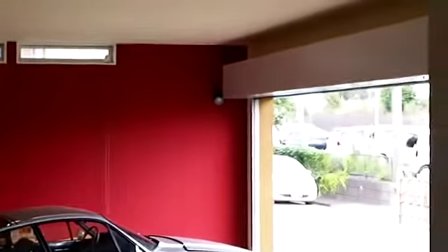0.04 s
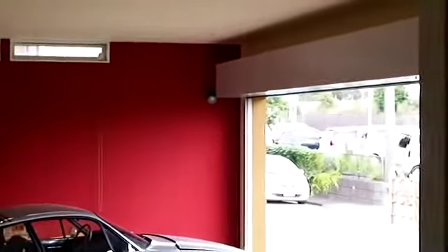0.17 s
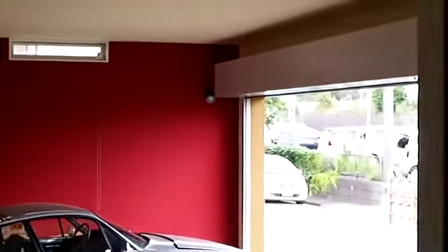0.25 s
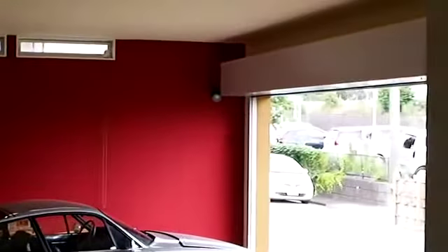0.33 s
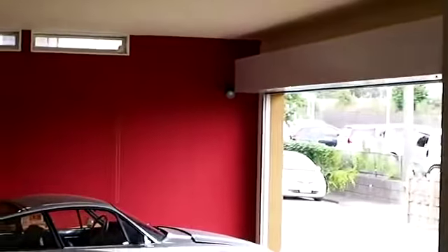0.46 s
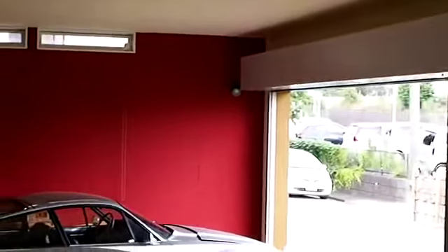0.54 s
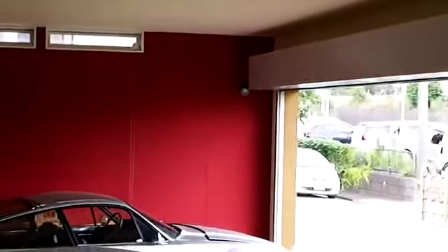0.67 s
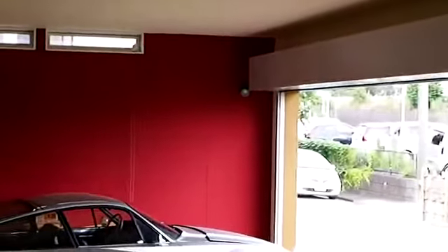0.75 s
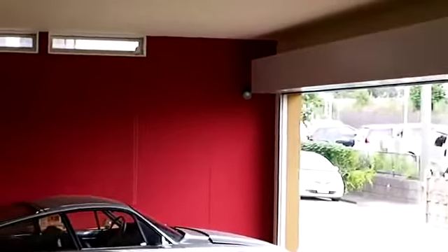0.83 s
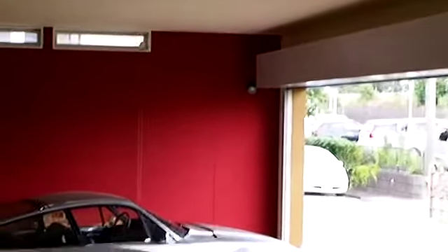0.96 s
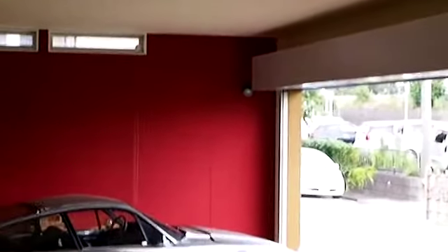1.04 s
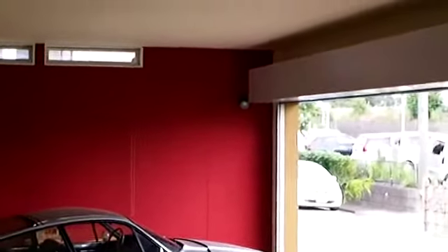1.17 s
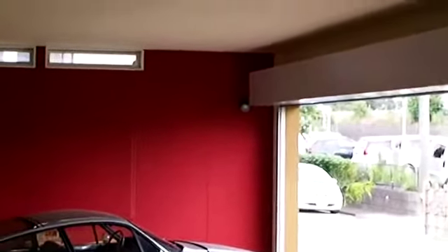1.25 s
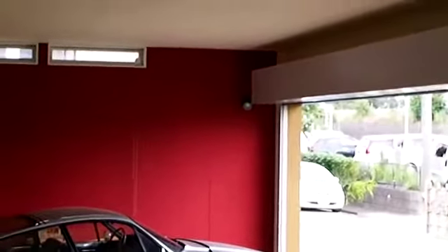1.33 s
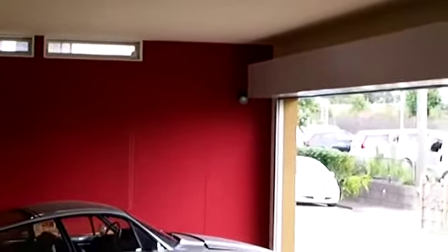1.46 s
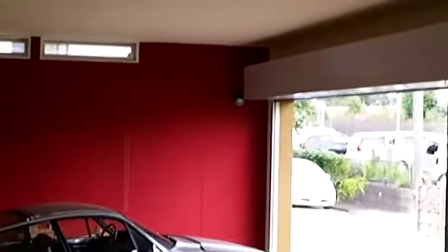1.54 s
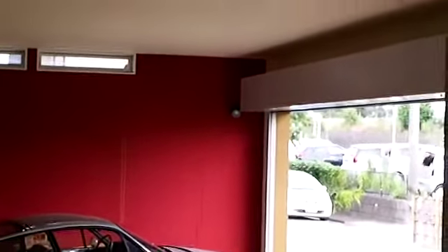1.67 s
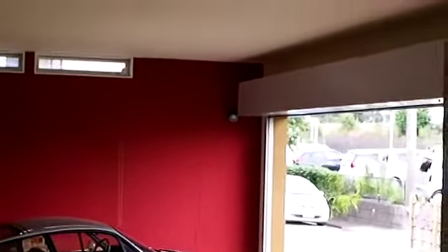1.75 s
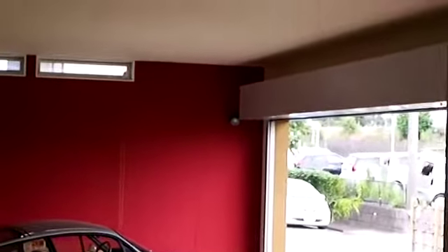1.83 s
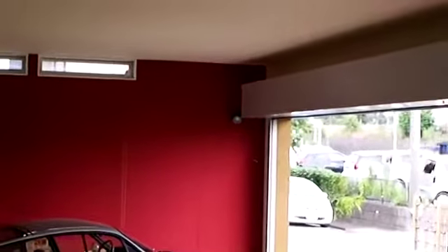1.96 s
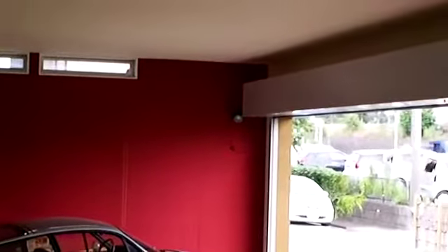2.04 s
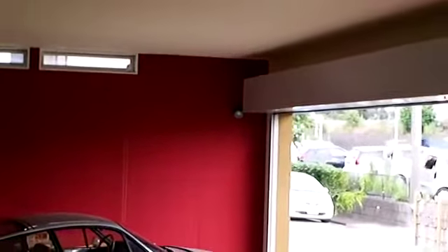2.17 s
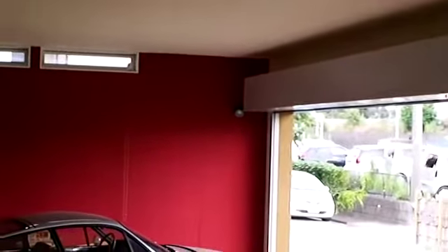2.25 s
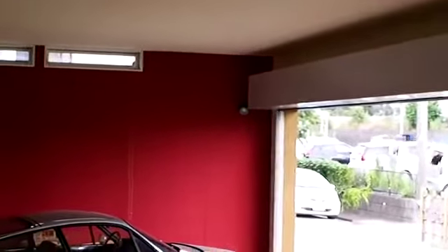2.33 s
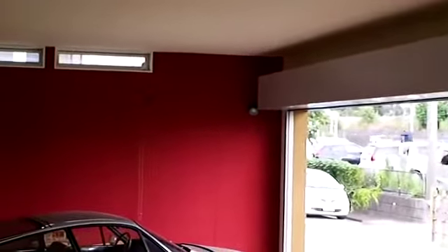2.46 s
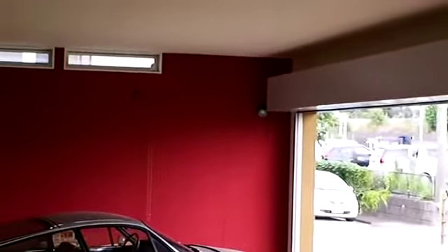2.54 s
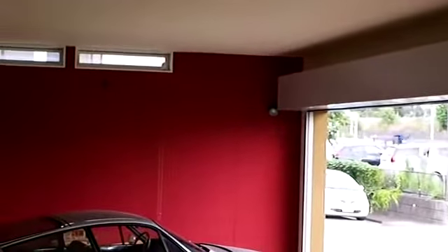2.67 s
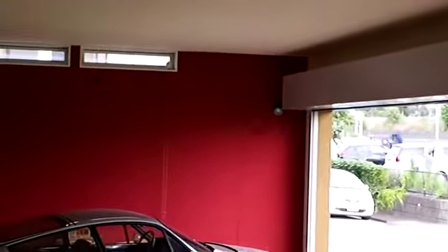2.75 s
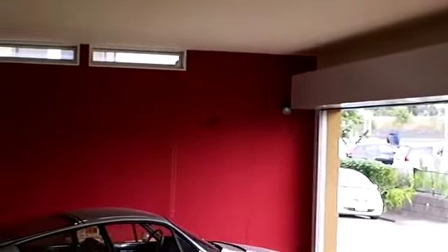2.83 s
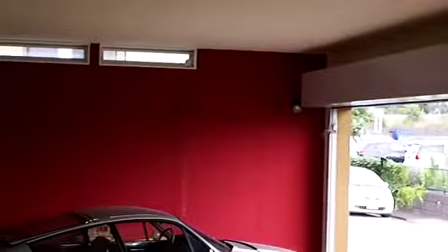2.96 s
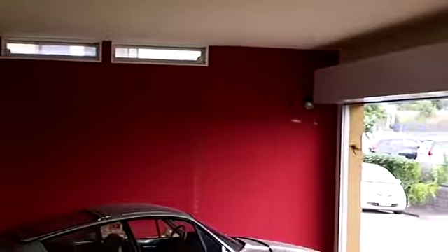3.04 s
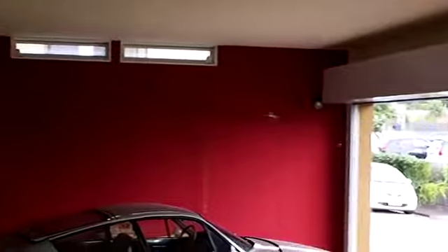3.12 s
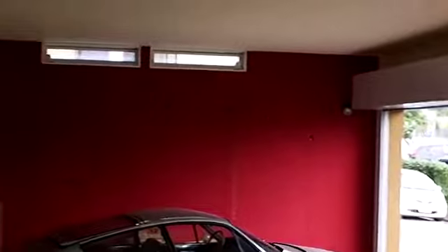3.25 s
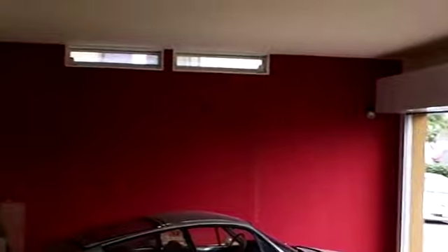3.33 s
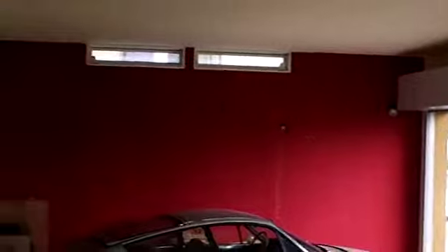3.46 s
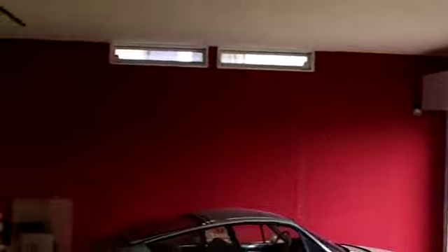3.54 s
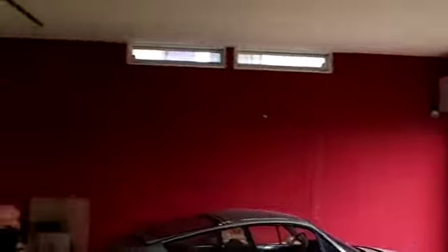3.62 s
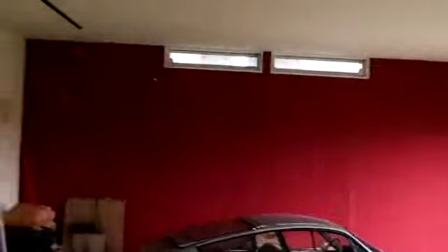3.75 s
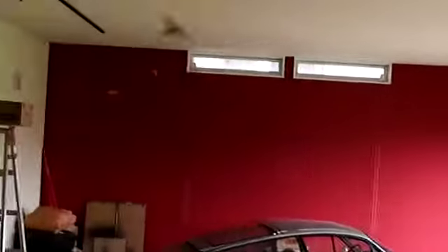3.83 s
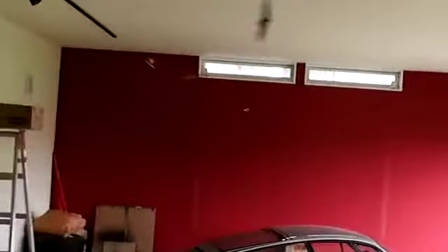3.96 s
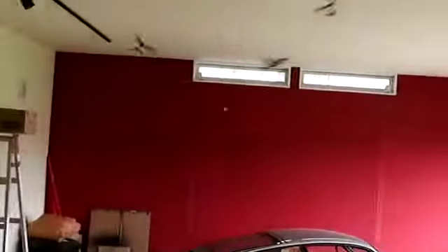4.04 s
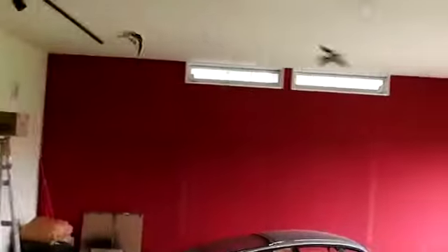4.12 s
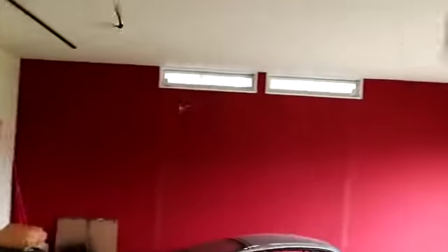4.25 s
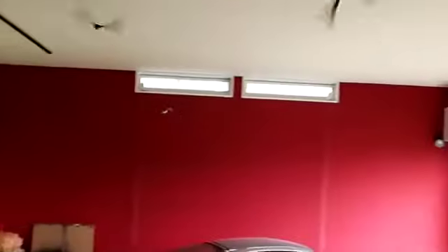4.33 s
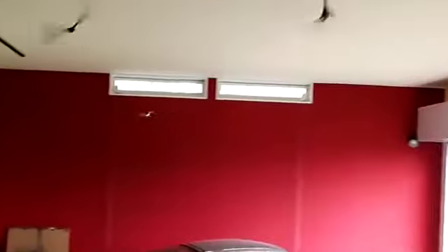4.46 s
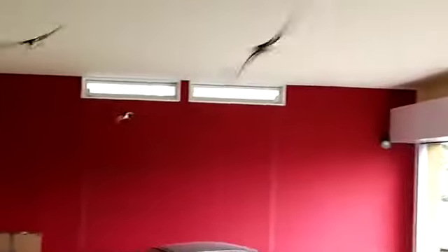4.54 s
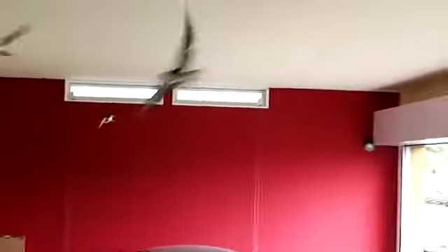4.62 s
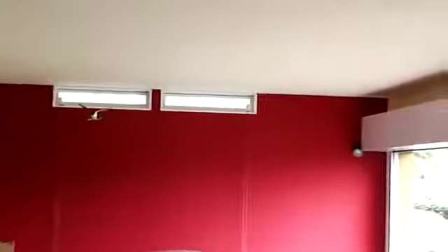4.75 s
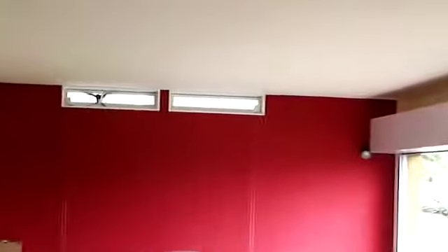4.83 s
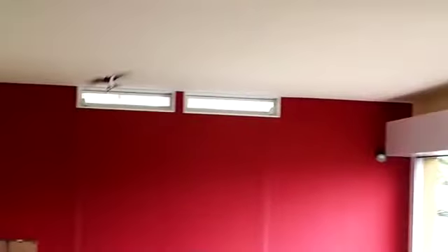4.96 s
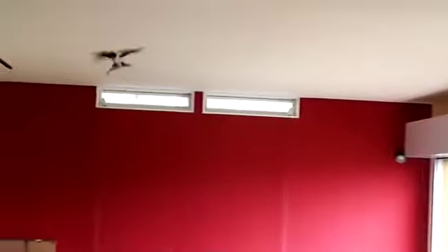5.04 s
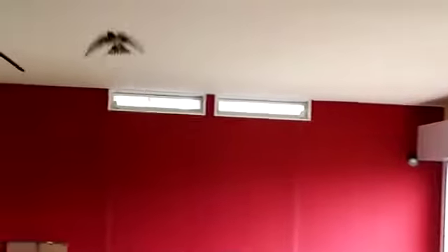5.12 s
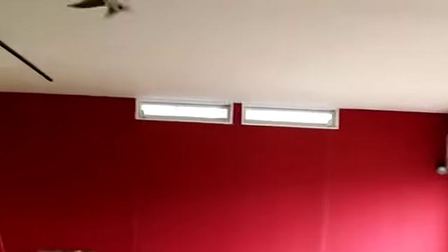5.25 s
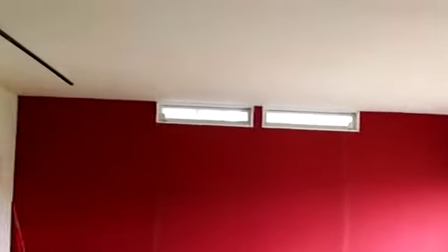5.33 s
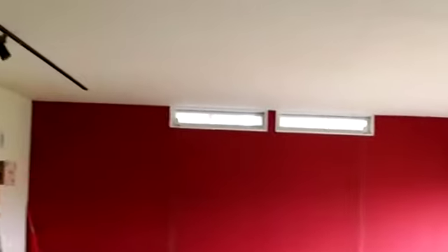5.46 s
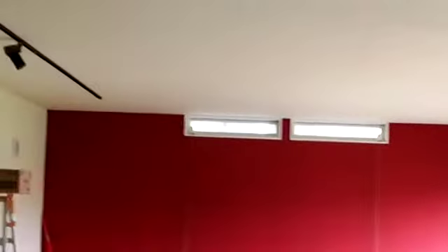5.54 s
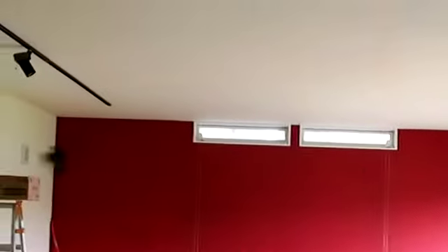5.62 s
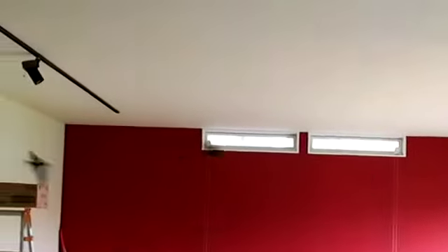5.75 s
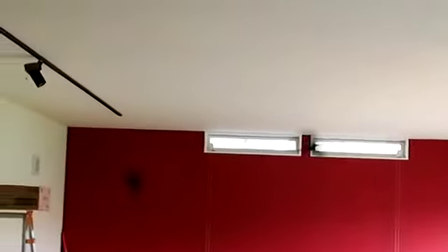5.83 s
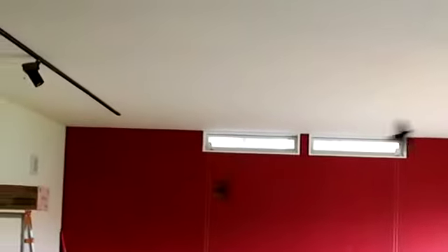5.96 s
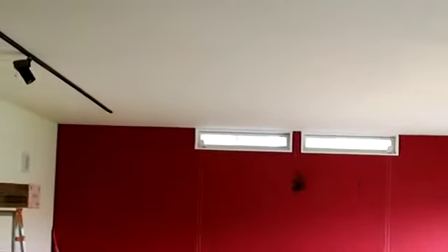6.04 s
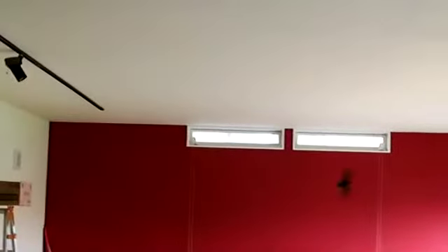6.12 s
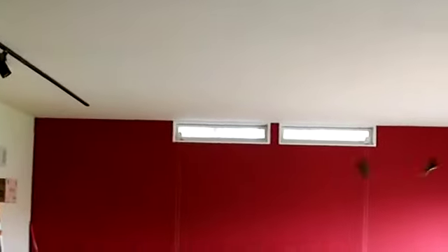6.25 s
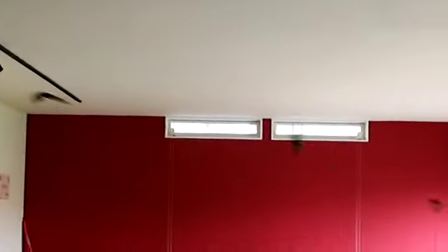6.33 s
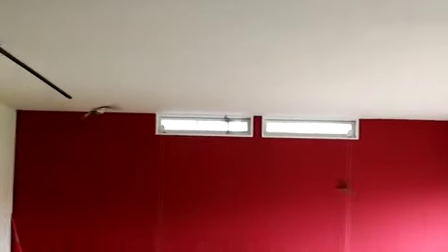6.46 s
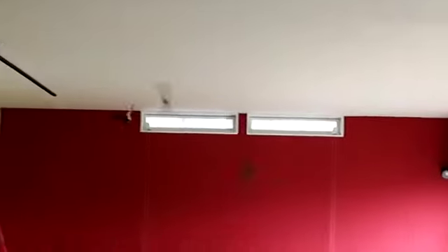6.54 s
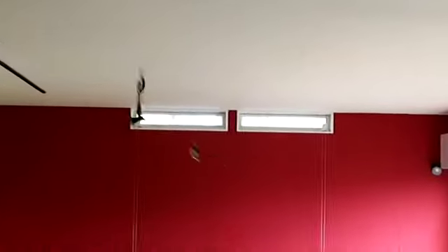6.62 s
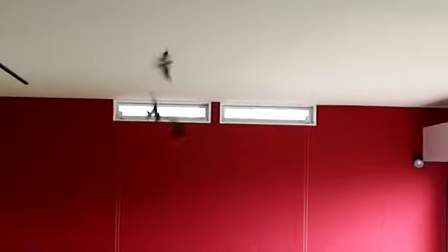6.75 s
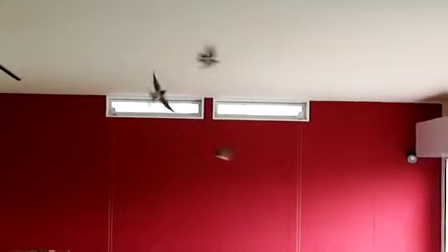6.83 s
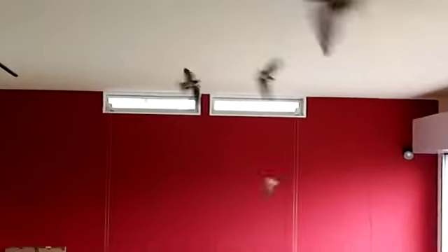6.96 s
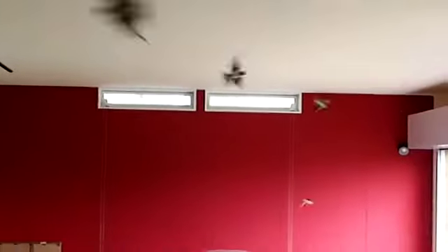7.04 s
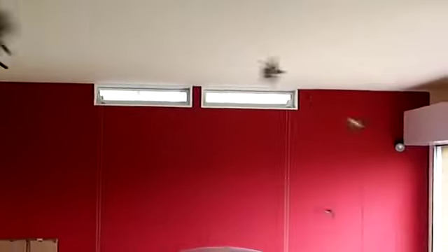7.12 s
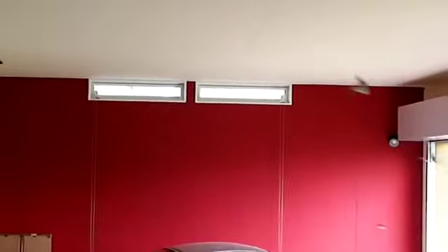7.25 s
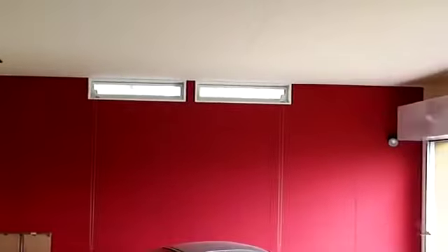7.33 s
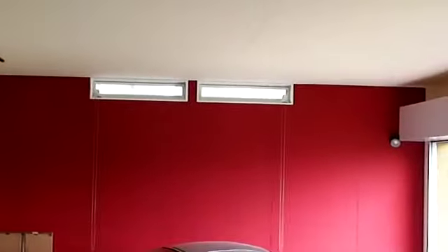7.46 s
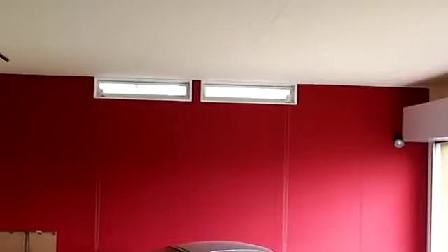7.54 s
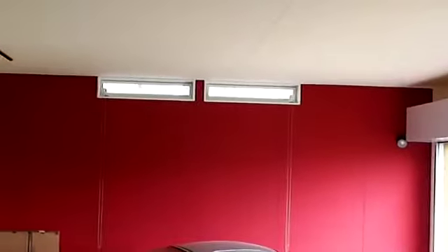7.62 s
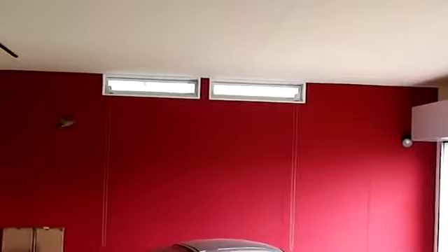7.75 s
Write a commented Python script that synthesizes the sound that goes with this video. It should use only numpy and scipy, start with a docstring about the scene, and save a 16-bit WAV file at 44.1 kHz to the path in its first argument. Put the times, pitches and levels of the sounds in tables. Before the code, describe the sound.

Swallows give sparse, short high chirps and squeaks in an echoing garage, growing louder into piercing alarm whistles over faint distant traffic.

```python
"""Swallows chirp, squeak and whistle in alarm inside a ringing garage, over distant traffic and a low hum.
Chirps and squeaks sum two frequency-modulated voices, one for each side of the syrinx; whistles, pips and
forked notes are nearly pure gliding tones. Convolution with decaying noise gives every call its echo.
Filtered noise makes the traffic, the room's resonances and a few faint ticks.
The recorder's suppressor pulls the lows down while the whistle band is loud."""
import sys
import numpy as np
from scipy import signal
from scipy.fft import rfft, irfft
from scipy.io import wavfile

SR = 44100
rng = np.random.default_rng(int(sys.argv[2]) if len(sys.argv) > 2 else 0)


def to_wav(sig):
    """Store sig (one row per channel, or 1-D mono) as 16-bit WAV at the path in sys.argv[1].

    Samples outside -1..1 are clipped; the rate is SR.
    """
    pcm = np.clip(np.atleast_2d(sig), -1, 1) * 32767
    pcm = np.round(pcm).astype(np.int16)
    wavfile.write(sys.argv[1], SR, pcm.T)  # frames by channels


N = 343524

# effort at the start of a whistle and at the pitch a pip starts from (dB)
START_DB = -10.5


def undb(db):
    """Amplitude ratio: 20 dB is a factor of ten."""
    return 10 ** (np.asarray(db) / 20)


def unit(x):
    """Power normalization: scale to an rms of 1."""
    return x / np.sqrt(np.mean(x ** 2))


def curve(t, rows):
    """Linear interpolation: join the rows by straight lines; one array per column after the first."""
    at, *columns = np.transpose(rows)
    return [np.interp(t, at, c) for c in columns]


def over_pitch(hz, points):
    """Logarithmic frequency axis: read (Hz, value) points at equal steps per octave."""
    at, value = np.transpose(points)
    return np.interp(np.log(hz + 1e-9), np.log(at), value)


def colour(x, points):
    """Linear filtering: weight the spectrum by (Hz, dB) points."""
    size = x.shape[-1]
    gain = undb(over_pitch(np.fft.rfftfreq(size, 1 / SR), points))
    return irfft(rfft(x) * gain, size)


def band(x, lo_hz, hi_hz, order=2):
    """Band-pass filtering: keep what lies between two frequencies."""
    hi_hz = min(hi_hz, SR / 2 - 1)
    return signal.sosfilt(signal.butter(order, [lo_hz, hi_hz], "band", fs=SR, output="sos"), x)


def wander(size, rate):
    """Slow random modulation: normal values, rate of them a second, joined by straight lines."""
    at = np.arange(size) * rate / SR
    count = int(at[-1]) + 2
    return np.interp(at, np.arange(count), rng.standard_normal(count))


def voice(hz, jitter, rate):
    """Frequency modulation: phase is the running sum of a trembling pitch."""
    trembling_hz = hz * (1 + jitter * wander(len(hz), rate))
    return 2 * np.pi * np.cumsum(trembling_hz) / SR


def add(out, sound, start):
    """Superposition: mix a stereo sound in at a time in seconds, cut at the edges."""
    i = int(start * SR)
    sound = sound[:, max(-i, 0):N - i]
    out[:, max(i, 0):max(i, 0) + sound.shape[1]] += sound


def two_voices(shape, length, top_hz, lower_db, overtone_db, rasp_db, jitter, lower_jitter):
    """Two coupled sources: both sides of the syrinx glide; the lower buzzes with overtones, sum tones and rasp."""
    # gain of throat and beak on the overtones: hz, gain_db
    beak = [(1500, -41), (2300, -42), (3200, 6.5), (6200, 7), (8000, 3), (10000, -3), (12300, 4),
            (15000, -22)]
    # the throat passes little below its resonance: hz, gain_db
    throat = [(1950, -10), (2400, 11), (2750, .5)]
    flick_s = .02  # length of the upward flick before the top

    start, end = -max(1.05 * length, flick_s + 1 / SR), shape[-1][0]
    t = np.arange(start, end, 1 / SR)
    # a longer call draws out its lead-in; the final flick always takes the same time
    progress = np.interp(t, [start, -flick_s, end], [shape[0][0], -flick_s, end])
    upper_share, upper_effort, lower_share, lower_effort = curve(progress, shape)
    upper = voice(top_hz * upper_share, jitter, rate=810)
    lower = voice(top_hz * lower_share, lower_jitter, rate=1100)

    sum_tones = undb(-6) * np.sin(upper + lower) + undb(-25) * np.sin(2 * upper)
    rasp = undb(-26.0) * np.sin(3 * lower) + undb(-11.5) * np.sin(4 * lower)
    rasp = rasp + undb(5.0) * rng.standard_normal(len(t))
    # the rasp grows with the effort
    rasp_gain = undb(rasp_db + 0.18 * lower_effort)
    overtones = colour(np.sin(2 * lower) + sum_tones + rasp_gain * rasp, beak)
    buzz = np.sin(lower) + undb(overtone_db) * overtones
    call = undb(upper_effort) * np.sin(upper) + undb(lower_db + lower_effort) * buzz

    # the air flow builds up over a moment and flutters, which makes the call scratchy
    swell = np.clip((t - start) / (.4 * length), 0, 1)
    flow = swell * undb(2.86 * wander(len(t), rate=450))
    return colour(flow * call, throat), t[0]


def chatter(table, shape, rasp_db, jitter, lower_jitter):
    """Superposition of all two-voiced calls of one kind, each with its own echo."""
    out = np.zeros((2, N))
    for s, length, top_hz, db, lower_db, overtone_db, direct_db in table:
        call, lead = two_voices(shape, length, top_hz, lower_db, overtone_db, rasp_db, jitter, lower_jitter)
        add(out, undb(db) * in_garage(call, direct_db, undb(-.5) * garage()), s + lead)
    return out


def chirps():
    """Rising glides: short calls whose two voices climb together and stop soon after the top."""
    # calls: top_s, length_s (nominal lead-in), top_hz, level_db, lower_voice_db, overtones_db, direct_db
    calls = [(.012, .067, 4230, -47.5, -4, -10.5, -1), (.475, 0.052, 4260, -42.5, -9, -9, -6),
             (1.57, .04, 4250, -51.5, -2.5, -1, -7), (1.76, 0.052, 4176, -49, -8, 2, -3),
             (1.915, .046, 4705, -40.5, .5, -14.5, -2), (2.402, .05, 4740, -38, 1.5, -20.5, -3),
             (3.08, 0.057, 4500, -33, .5, -18.5, -2.5), (3.38, .046, 4296, -30, -3, -13.5, 0.5),
             (3.637, 0.05, 4580, -24.5, -.5, -13.5, -3), (4.655, 0.047, 4418, -27.5, -2, -13, 7.5),
             (5.11, .042, 4592, -25.5, 1, -18.5, -4.5), (5.26, 0.033, 4427, -28, 0, -16.5, -0.5),
             (5.825, 0.056, 4612, -26.5, 0.5, -16.5, -3), (6.195, .044, 4513, -27, -2.5, -14, -5),
             (7.163, .034, 4594, -27.5, -9, -4.5, -2.5), (7.648, 0.056, 4460, -29, -6.5, -1.5, -1)]
    # motion: from_top_s, upper_share (of the top pitch), upper_db, lower_share, lower_db
    shape = [(-.055, .67, 12.5, .62, -35), (-.033, 0.68, -6.5, .57, -10.5), (-.015, 0.83, 4.5, .63, 4),
             (-.003, 1, 0.5, .69, 2), (.004, .93, 11, .72, 1.5), (.01, 1, -40, .59, -44)]
    return chatter(calls, shape, rasp_db=-4, jitter=.02, lower_jitter=.03)


def squeaks():
    """Irregular modulation: harsher calls whose lower voice trembles more."""
    # calls: top_s, length_s (nominal lead-in), top_hz, level_db, lower_voice_db, overtones_db, direct_db
    calls = [(1.16, .045, 5580, -34.5, -6, -5, -4), (2.07, 0.063, 5726, -24.5, -9, -4.5, -9),
             (2.565, 0.055, 5490, -30, 5, -10, -2), (3.16, 0.071, 5554, -27.5, -6, 1, -1.5),
             (3.702, .021, 5380, -24, -2.5, -6, 1.5), (3.848, 0.099, 5445, -25, 0, -7.5, 1),
             (4.2, 0.13, 5386, -26, -7, 5, -0.5), (4.375, 0.061, 5103, -29, -13.5, 11.5, 3.5),
             (4.825, 0.074, 5550, -26.5, -5, 0, -2.5), (5.33, .04, 5628, -18, -14.5, -2, -4.5),
             (7.669, .04, 5560, -25, -4, -3, -1.5)]
    # motion: from_top_s, upper_share (of the top pitch), upper_db, lower_share, lower_db
    shape = [(-.08, 0.63, -1, .52, 9), (-.057, .66, -4.5, .55, -6.5), (-.025, .77, -0.5, .57, -2.5),
             (-.009, .89, -2, .72, -0.5), (0, .99, 11, .78, 0.5), (.008, 1, 0, 0.54, -24),
             (.013, 0.92, -35, 0.52, -36)]
    return chatter(calls, shape, rasp_db=-2, jitter=0.017, lower_jitter=0.0483)


def clear_tone(hz):
    """Near-sinusoidal oscillation: a trembling tone with a faint octave and a trace of hiss."""
    phase = voice(hz, jitter=0.0257, rate=420)
    hiss = undb(-15.5) * band(rng.standard_normal(len(hz)), 9960, 11200, order=1)
    tone = np.sin(phase) + undb(-24) * np.sin(2 * phase) + hiss
    return tone * signal.windows.tukey(len(hz), .12)


def whistles():
    """Pitch and effort glides: each alarm whistle scoops up, holds while it slackens, lifts and drops away."""
    # calls: start_s, length_s, scoop_s, held_hz, crest_hz, level_db, end_effort_db, direct_db
    calls = [(5.417, .11, 0.011, 5285, 5840, -14, -21, 2), (6.196, 0.16, .016, 4984, 5897, -16, -20, -1.5),
             (6.787, .122, .036, 5090, 5730, -15, -12, -6), (7.17, .118, .022, 5430, 5660, -12, -7.5, -1.5)]
    scoop_from, drop_to = .72, .72  # first pitch as a share of the held one, last as a share of the crest
    lift_at, crest_at, drop_at = 0.35, .67, .77  # shares of the length
    slack_db, crest_db = -5.5, 0.5  # effort before the lift and at the crest

    out = np.zeros((2, N))
    for s, length, scoop, held_hz, crest_hz, db, end_db, direct_db in calls:
        # share of the length, pitch in Hz, effort in dB
        stages = [(0, scoop_from * held_hz, START_DB), (scoop / length, held_hz, 0),
                  (lift_at, held_hz, slack_db), (crest_at, crest_hz, crest_db),
                  (drop_at, crest_hz, crest_db), (1, drop_to * crest_hz, end_db)]
        hz, effort_db = curve(np.linspace(0, 1, int(length * SR)), stages)
        call = clear_tone(hz) * undb(db + effort_db)
        add(out, in_garage(call, direct_db, garage()), s)
    return out


def pips():
    """Parabolic glide: one quick arch of pitch, loudest at its top, just ahead of a whistle."""
    # calls: start_s, length_s, top_hz, level_db, direct_db
    calls = [(6.167, 0.0194, 5500, -9.5, -1), (6.768, 0.0291, 5320, -12.5, -3)]
    pip_from, top_at = .74, 0.59  # first pitch as a share of the top one, time of the top as a share of the length

    out = np.zeros((2, N))
    for s, length, top_hz, db, direct_db in calls:
        off_top = (np.linspace(0, 1, int(length * SR)) / top_at - 1) ** 2
        call = clear_tone(top_hz * (1 - (1 - pip_from) * off_top)) * undb(db + START_DB * off_top)
        add(out, in_garage(call, direct_db, garage()), s)
    return out


def forks():
    """Independent sources: the syrinx's two sides part; one arches up and back, the other falls ever faster."""
    # notes that open an alarm: start_s, length_s, top_hz, level_db, falling_end_hz, direct_db
    calls = [(6.068, 0.046, 7150, -16.5, 3680, -2), (6.679, .036, 6800, -13.5, 3140, -2)]
    fork_hz = 5350  # both voices part from this pitch
    thin_db, attack_s = -17, 0.0076  # upper voice: change of level at its top, time to swell
    falling_db, falling_share = -9.5, 0.82  # falling voice: relative level, share of the length

    out = np.zeros((2, N))
    for s, length, top_hz, db, end_hz, direct_db in calls:
        arch = np.sin(np.linspace(0, np.pi, int(length * SR)))
        fall = np.linspace(0, 1, int(falling_share * length * SR)) ** 2
        upper = clear_tone(fork_hz + (top_hz - fork_hz) * arch) * undb(db + thin_db * arch ** 2)
        upper = upper * np.clip(np.arange(len(arch)) / (attack_s * SR), 0, 1)
        lower = clear_tone(fork_hz + (end_hz - fork_hz) * fall) * undb(db + falling_db)
        for call in (upper, lower):
            add(out, in_garage(call, direct_db, garage()), s)
    return out


def from_somewhere(call, size=2):
    """Interaural delay: a path from a random direction reaches the microphones a few samples apart."""
    lag = rng.integers(-size, size + 1)
    return np.array([call, np.roll(call, lag)])


def in_garage(call, direct_db, tail):
    """Room response: direct sound, four early reflections off ceiling and walls, and the diffuse tail."""
    heard = signal.fftconvolve(call[None], tail, axes=1)
    add(heard, undb(direct_db) * from_somewhere(call), 0)
    for delay in rng.uniform(.005, .028, 4):
        add(heard, undb(-14.0) * from_somewhere(call), delay)
    return heard


def garage_tail():
    """Exponential decay: noise bands die away at their own rates, independently in each channel."""
    # reverberation of the garage: hz, t60_s
    reverberation = [(2500, 0.95), (4000, 0.81), (5500, 0.91), (8000, 0.74), (13000, 0.73)]
    t = np.arange(SR) / SR
    edges = np.geomspace(1000, 16000, 9)
    noise = rng.standard_normal((2, SR))
    # uneven strengths at first, merging into an even wash
    noise *= np.exp(0.3 * np.exp(-t / 0.023) * (rng.standard_normal(SR) - 1))
    tail = np.zeros((2, SR))
    for lo, hi in zip(edges, edges[1:]):
        t60 = over_pitch(np.sqrt(lo * hi), reverberation)
        tail += band(noise, lo, hi) * np.exp(-np.log(1000) * t / t60)
    tail *= np.clip(t / .008, 0, 1)
    # unit energy, averaged over both channels
    return unit(tail) / np.sqrt(SR)


def garage():
    """Spatial coherence: two close microphones share the lower part of the walls' echo."""
    left, right = garage_tail()
    shared = [(2000, -6), (4000, -12), (7000, -30)]  # Hz, dB
    return undb(3.0) * np.array([left + colour(right, shared), right + colour(left, shared)])


def ticks():
    """Damped impulses: tiny knocks of decaying band-passed noise, with a weaker echo."""
    # knocks: start_s, level_db, centre_hz
    knocks = [(.112, -37, 7000), (0.871, -30, 2980), (0.9, -28, 3970), (1.399, -36, 8030),
              (4.199, -16, 4000)]
    out, t = np.zeros((2, N)), np.arange(SR // 20) / SR
    for s, db, hz in knocks:
        burst = rng.standard_normal(len(t)) * np.exp(-t / 0.0044)
        knock = undb(db) * band(burst, hz / 2, hz * 2, order=1)
        add(out, from_somewhere(knock), s)
        add(out, undb(-6) * signal.fftconvolve(knock[None], garage(), axes=1), s)
    return out


def background():
    """Filtered noise and resonance: traffic through the door, boomy room modes and a low wavering hum."""
    # relative traffic spectrum, before the bass is trimmed: hz, level_db
    street = [(18, -52), (30, -40), (54, -8), (181, -7), (217, -2.5), (373, -12), (871, -6.5), (1100, -11),
              (1250, -10.5), (2920, -22), (3580, -25), (3970, -26), (5990, -30), (6640, -30),
              (14000, -34.5)]
    # stereo width of the traffic: hz, side_minus_mid_db
    width_points = [(100, -21.5), (600, -28), (1300, -15.5), (3000, -1.5), (8000, -1.5)]
    # slow swell of traffic and resonances together: time_s, level_db
    street_level = [(0, -43.3), (1.05, -44.5), (1.7, -42), (2.3, -43.5), (2.8, -41.5), (3.2, -43),
                    (5.3, -43.5), (6.1, -41), (7.79, -45.5)]
    # low room resonances, before the swell: centre_hz, width_hz, level_db
    resonances = [(116.2, 17, -13.5), (218.1, 21, -13.5), (276, 21, -16)]
    # hum, which sinks late on: time_s, level_db
    hum_level = [(0, -52.5), (2.5, -57), (4, -50), (5.2, -50), (5.5, -62)]
    time = np.arange(N) / SR

    mid, side = (colour(rng.standard_normal(N), street) for _ in range(2))
    air = mid + colour(side, width_points) * np.array([[1], [-1]])
    air = air / np.std(band(mid, 300, 1700))
    air = colour(air, [(35, -5), (55, -7), (75, 1)])

    boom = np.zeros(N)
    for hz, width, db in resonances:
        mode = unit(band(rng.standard_normal(N), hz - width / 2, hz + width / 2))
        boom += mode * undb(db + 1.8 * wander(N, rate=4.2))

    hum = unit(np.sin(voice(np.full(N, 59), jitter=.06, rate=32)))
    hum = hum * undb(1.62 * wander(N, rate=12))
    traffic = (air * undb(-1.11) + boom) * undb(curve(time, street_level)[0])
    return traffic + hum * undb(curve(time, hum_level)[0])


def scene():
    """Superposition: the swallows, louder at the left microphone, over ticks and background."""
    # interchannel level difference of the birds: hz, left_minus_right_db
    balance = [(4000, 1.3), (8000, 1.4), (12000, 3)]
    birds = chirps() + squeaks() + whistles() + pips() + forks()
    heard = []
    for ear, sign in zip(birds, (1, -1)):
        heard.append(colour(ear, [(hz, sign * db / 2) for hz, db in balance]))
    return np.array(heard) + ticks() + background()


def suppress(x):
    """Sidechain compression: sustained power in the whistle band turns the lows down until it fades."""
    threshold_db, slope = -21.5, 2.45  # band level where the cut sets in, dB of cut per dB well above it
    reaction_s, cut_below_hz = 0.054, 3070

    power = np.mean(band(x, 4800, 6500, order=4) ** 2, axis=0)
    keep = np.exp(-1 / (reaction_s * SR))
    # two smoothing stages in a row
    for _ in range(2):
        power = signal.lfilter([1 - keep], [1, -keep], power)
    # soft knee: 1 well below the threshold, the power ratio well above it
    over = np.hypot(1, power / undb(threshold_db) ** 2)
    lows = signal.sosfiltfilt(signal.butter(6, cut_below_hz, fs=SR, output="sos"), x)
    return x + lows * (over ** (-slope / 2) - 1)


def record(dry):
    """Band limiting: the recorder ducks the lows under loud whistles and cuts the top above 14450 Hz."""
    return signal.sosfilt(signal.ellip(12, .2, 80, 14450, fs=SR, output="sos"), suppress(dry))


dry = scene()
out = record(dry)
to_wav(out)
```